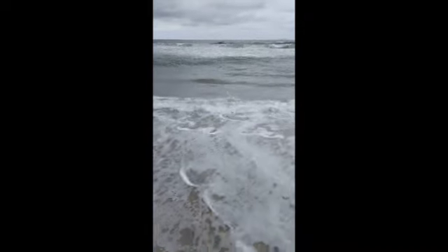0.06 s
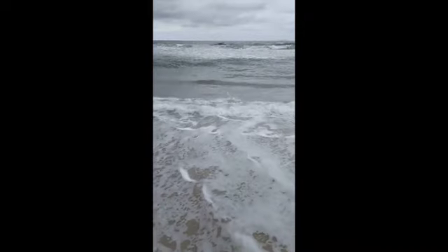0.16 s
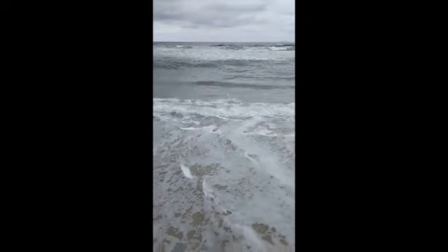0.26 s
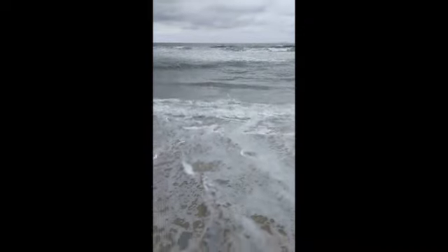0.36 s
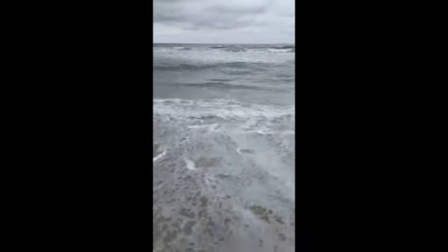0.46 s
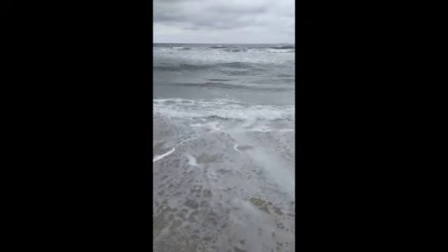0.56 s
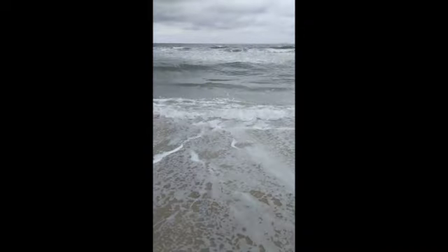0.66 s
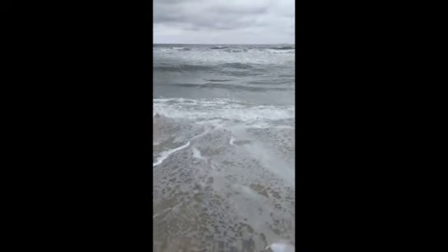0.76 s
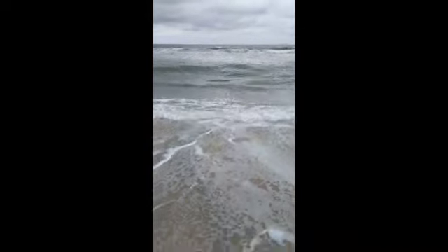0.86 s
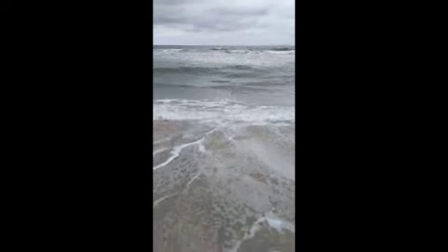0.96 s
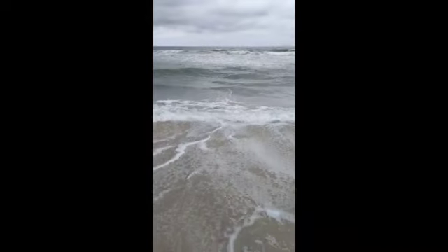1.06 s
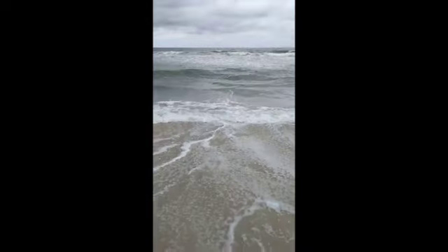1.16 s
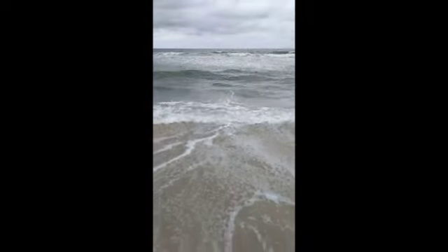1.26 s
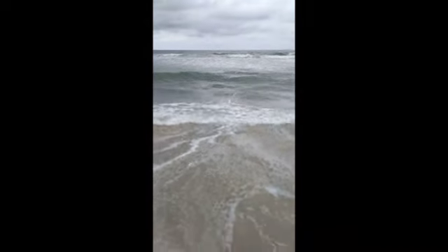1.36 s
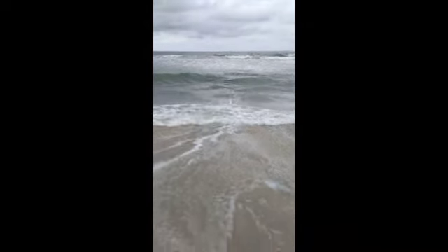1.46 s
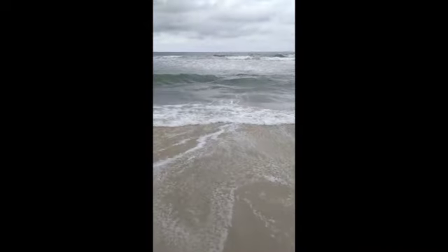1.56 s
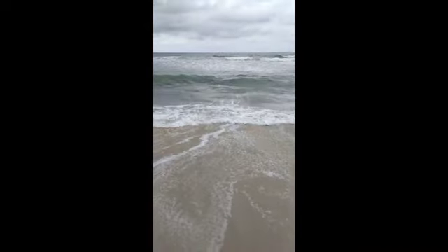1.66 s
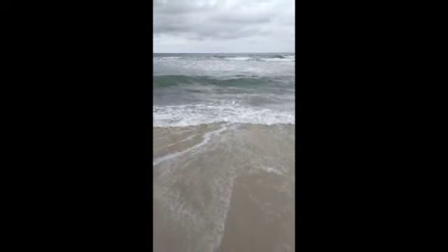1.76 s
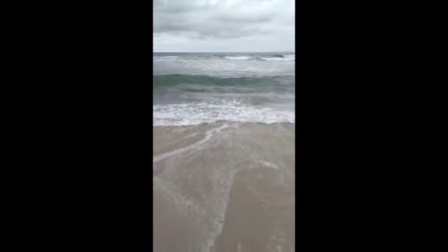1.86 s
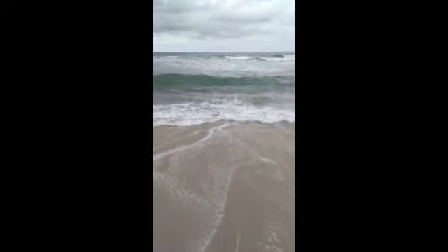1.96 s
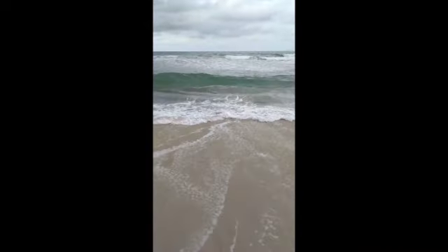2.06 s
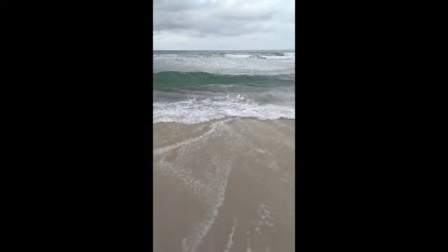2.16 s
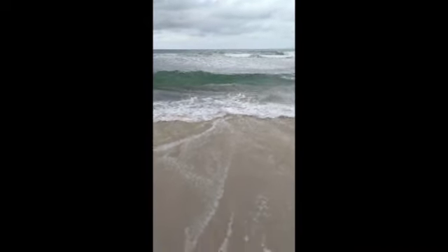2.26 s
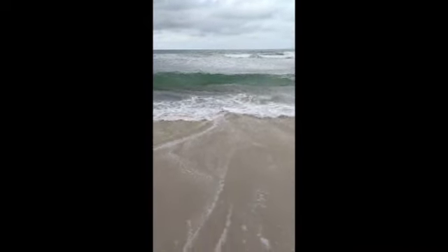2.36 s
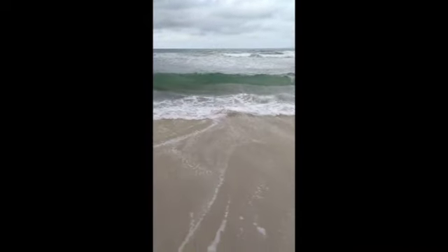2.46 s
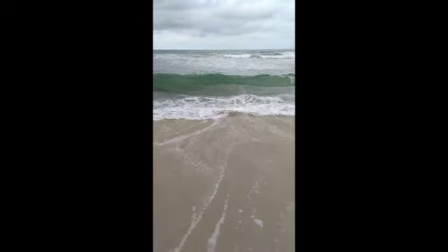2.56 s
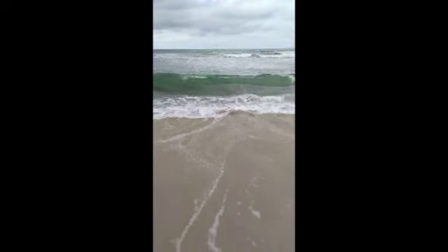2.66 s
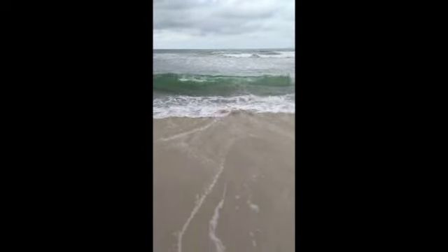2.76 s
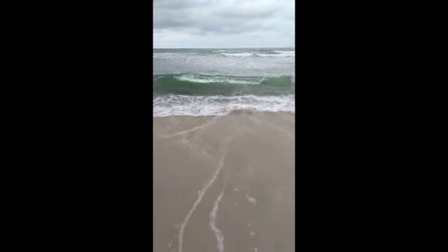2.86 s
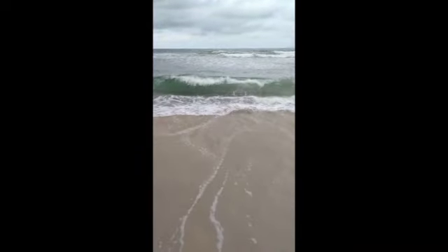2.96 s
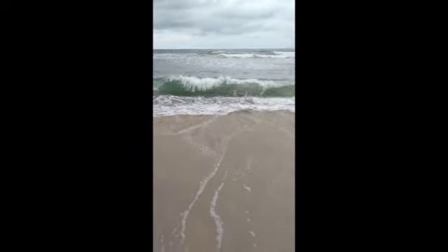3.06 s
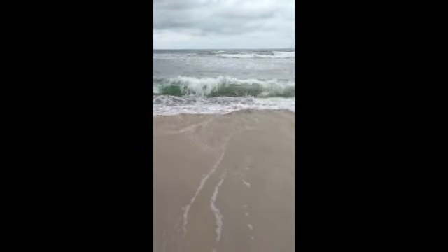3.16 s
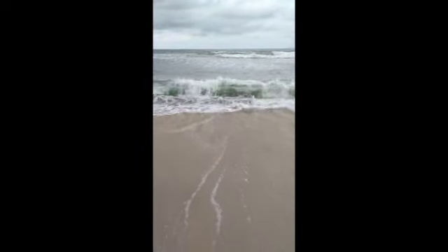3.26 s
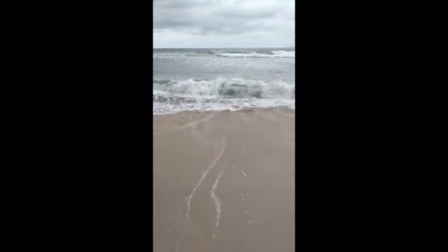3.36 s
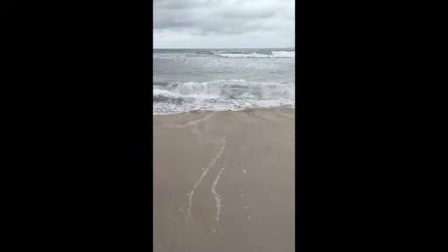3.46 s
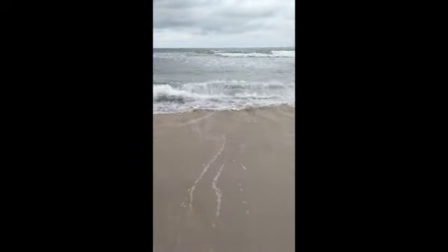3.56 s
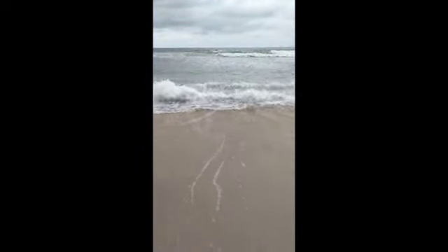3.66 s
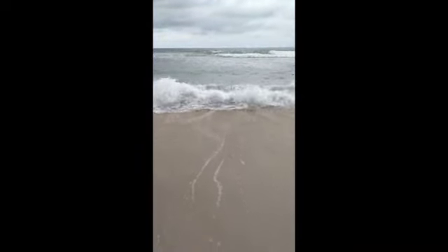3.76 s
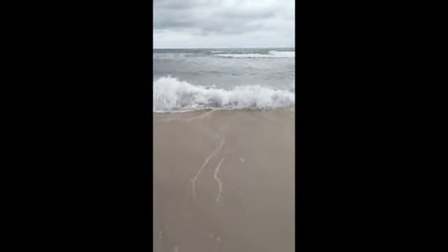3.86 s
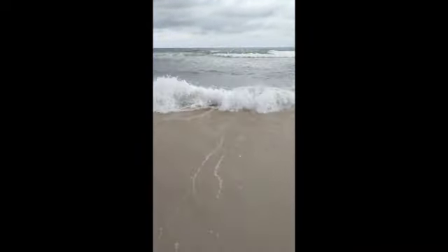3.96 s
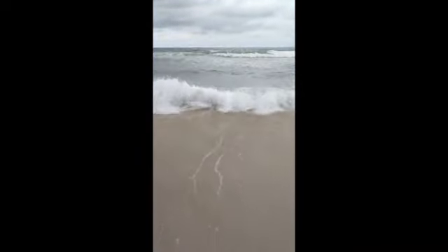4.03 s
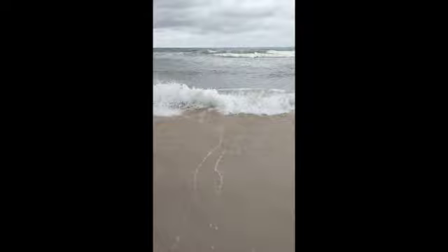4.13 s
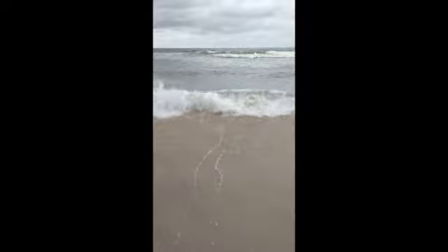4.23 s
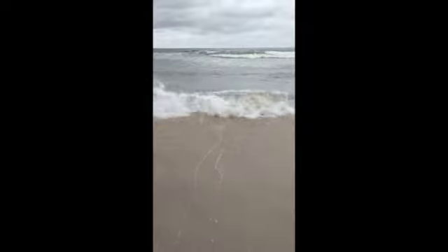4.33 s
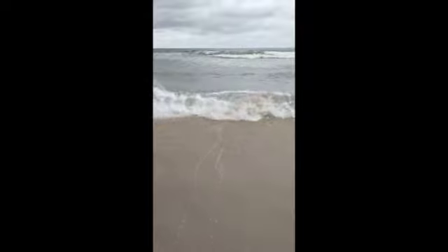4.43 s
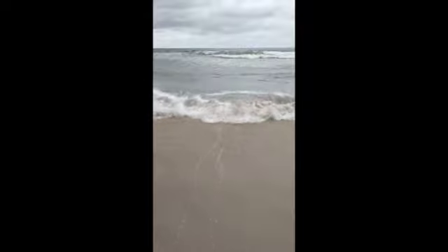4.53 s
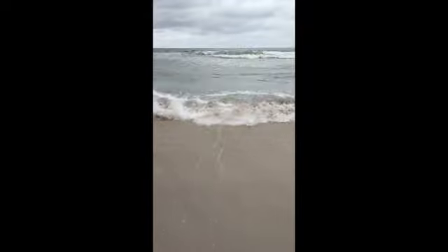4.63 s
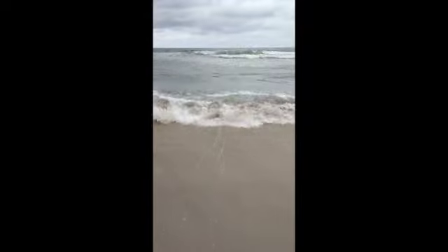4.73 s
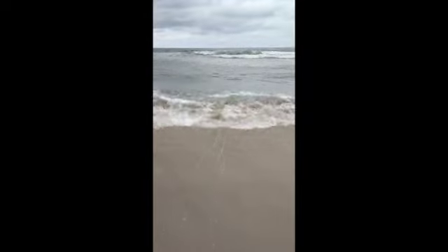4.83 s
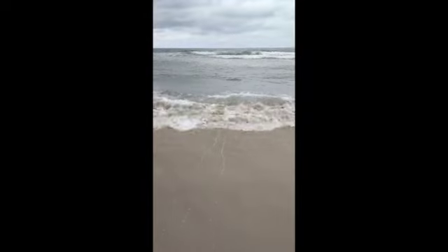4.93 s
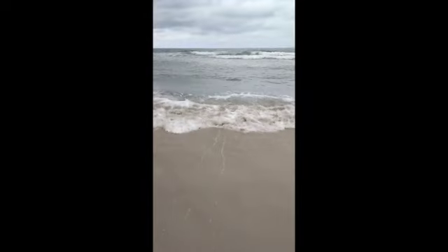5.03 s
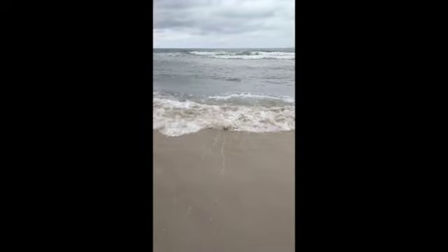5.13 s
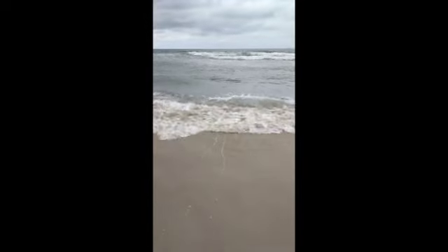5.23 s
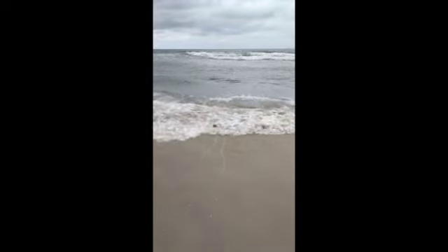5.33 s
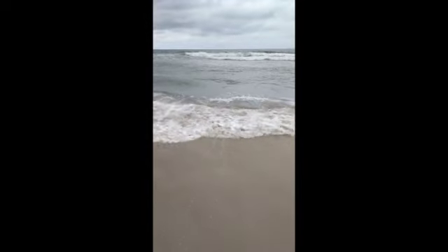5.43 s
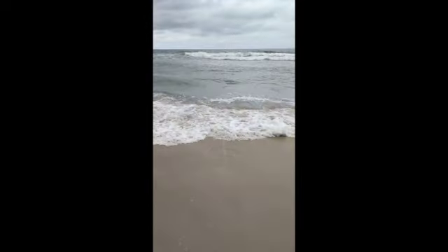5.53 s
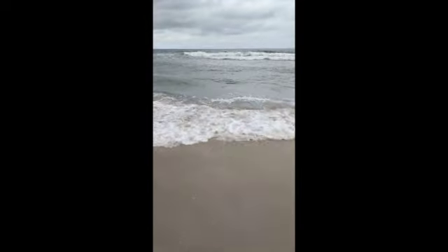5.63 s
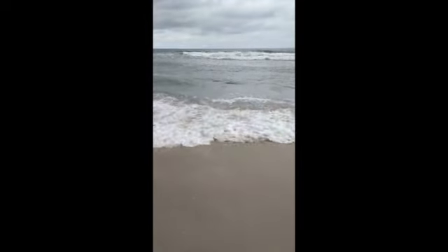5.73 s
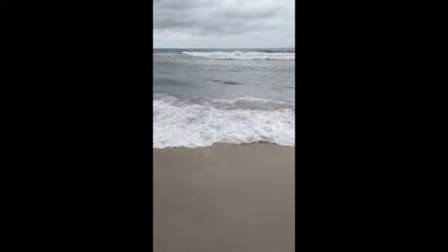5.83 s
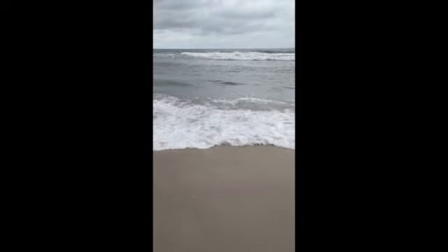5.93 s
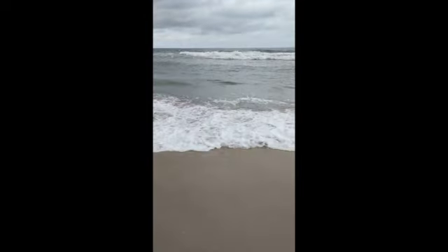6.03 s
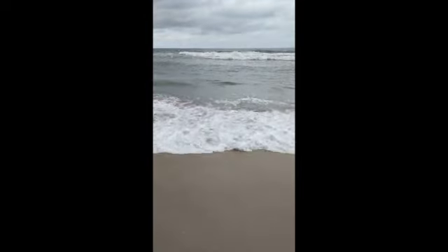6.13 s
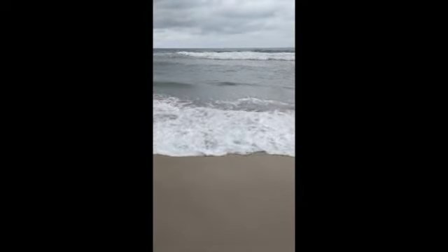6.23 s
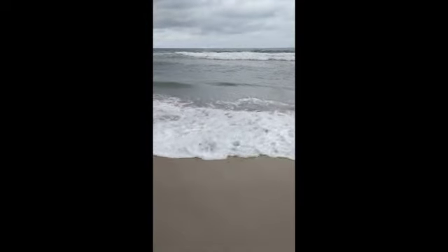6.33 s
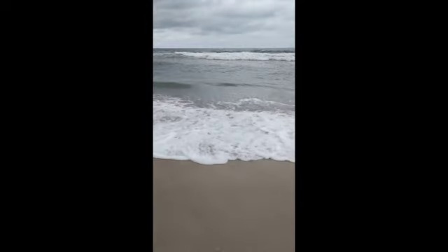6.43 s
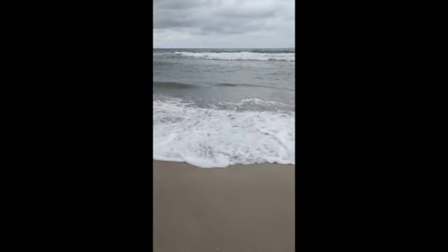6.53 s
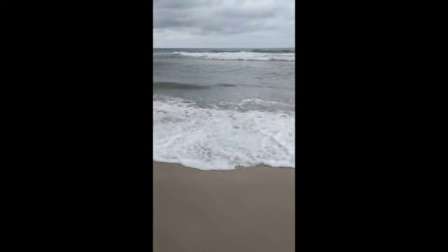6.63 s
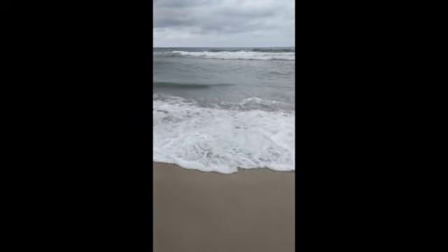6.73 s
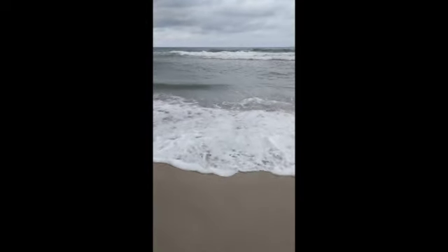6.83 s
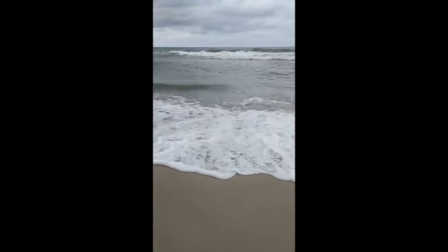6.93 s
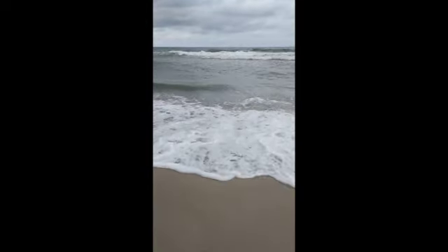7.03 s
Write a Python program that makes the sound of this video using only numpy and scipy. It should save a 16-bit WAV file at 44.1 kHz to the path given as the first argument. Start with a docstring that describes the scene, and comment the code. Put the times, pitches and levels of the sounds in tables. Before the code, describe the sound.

Outdoors on a sandy shore, heard close through a hand-held stereo microphone without wind protection. At 0 s a strong foamy wash drops quickly into a quieter draining rush. Until about 2.2 s, wind rumbles and hits the microphone in irregular, dull, bassy thumps, crowded between 0.6 and 1.8 s, with a heavy one near 2.2; the sound ducks briefly after the strongest. Around 2.8 s the surf brightens suddenly as the next wave curls over. From 3 to 4.7 s it breaks in uneven surges, deep boom and mid roar beneath splashing and dense, fine bubbling hiss, fullest around 4.1 to 4.7. It then runs up the sand as a broad fizzing wash, easing after 5.5 s. Scattered wind thumps continue near 3.2, 4.1, 4.7 and 5.1, with several softer ones from 6.2 to 6.9. A brief low surge comes near 6.5 before the thinner foam fades somewhat by 7 s.

```python
"""Surf and wind on a sandy beach

One wave drains away, then the next curls over, breaks and runs up the sand as fizzing foam.
The surf is patchy noise mixed with small ringing bubbles, in four layers: boom, roar, splash and hiss.
Wind rumbles and thumps on the two ports of a hand-held microphone, which widens its stereo by
taking a delayed copy of each port from the other. Its gain control ducks after strong thumps.
"""
import sys
import numpy as np
from scipy import signal
from scipy.fft import rfft, irfft, next_fast_len
from scipy.io import wavfile
from scipy.ndimage import uniform_filter1d, map_coordinates

SR = 44100
rng = np.random.default_rng(int(sys.argv[2]) if len(sys.argv) > 2 else 0)


def int16_out(signal):
    """Quantize to a 16-bit WAV file."""
    q = np.round(np.clip(np.atleast_2d(signal).T, -1, 1) * 32767)
    wavfile.write(sys.argv[1], SR, q.astype(np.int16))


N = 312669  # length [samples]
CROSS_DELAY_S = 18.9 / SR  # delay of the copy taken from the other port
TOP_HZ = 14300  # nothing is kept from this frequency up

# How the sea reaches the two ports, before the widening:
# (frequency [Hz], likeness of the ports [0-1], left lead [rad], left over right [dB])
SEA_AT_PORTS = [(120, .93, 0, 0), (320, .99, .02, -.4), (500, .86, .4, -4.5), (640, .5, 1.8, -2.5),
                (800, .6, 1.6, 3.5), (1000, .5, 1, 1), (1400, .5, 2.4, 2), (1850, .65, 2.1, 3),
                (2000, .6, 2.2, 2.5), (2110, .998, 3.13, .1), (2480, .995, 3.13, .1), (2600, 0, 3.1, 3),
                (4250, .1, 3.1, 2), (4450, .96, 3.1, .2), (4900, .96, 3.1, .2), (5200, .1, 3.1, 1.5),
                (7000, .1, 3.1, 0), (9000, .05, 0, -2.3), (12000, .05, 0, -5.5)]
# The same columns for wind, which presses on each port almost by itself:
# (frequency [Hz], likeness of the ports [0-1], left lead [rad], left over right [dB])
WIND_AT_PORTS = [(100, 0.42, 0.035, -0.44)]


def amp(db):
    """Turn decibels into a gain factor."""
    return 10 ** (np.asarray(db) / 20)


def unit(x):
    """Scale to an rms (average strength) of 1."""
    return x / np.sqrt(np.mean(x ** 2) + 1e-20)


def along(points, hz):
    """Read each column after the frequency at the given pitches, on a logarithmic axis."""
    f, *columns = np.transpose(points)
    return np.array([np.interp(np.log(hz + 1), np.log(f + 1), column) for column in columns])


def curves(rows):
    """Draw each column after the time as a curve with one value per sample."""
    s, *columns = np.transpose(rows)
    return [np.interp(np.arange(N) / SR, s, column) for column in columns]


def wobble(rate):
    """Make a smooth random curve through `rate` random points a second."""
    points = rng.standard_normal(int(N * rate / SR) + 4)
    return map_coordinates(points, [np.arange(N) * rate / SR])


def churn(patchy_db, size=7):
    """Two unrelated noises share brief patches of random gain, smoothed over `size` frequency bins."""
    noise_bins = signal.stft(rng.standard_normal((2, N)), nperseg=512)[2]
    patches = rng.standard_normal(noise_bins.shape[1:])
    patches = uniform_filter1d(patches, size, 0)  # smooth over frequency
    patches = uniform_filter1d(patches, 12, 1)  # smooth over time
    patchy_bins = noise_bins * amp(patchy_db * unit(patches))
    return unit(signal.istft(patchy_bins, nperseg=512)[1][:, :N])


def bubbles(pitch_hz, cycles, spread_db, count, size):
    """Bubbles ring as dying sines that rise in pitch, many weak and a few strong, in two streams."""
    when, port = rng.random((2, count))
    hz = np.clip(pitch_hz * np.exp(.5 * rng.standard_normal((count, 1))), 100, TOP_HZ)
    strength = amp(spread_db * np.minimum(rng.exponential(size=(count, 1)), 4))

    # age counts from 0; it is 1 after `cycles` cycles of the starting pitch
    step = (hz / SR / cycles).astype(np.float32)
    age = step * np.arange(size, dtype=np.float32)
    rise = 1 + 0.078 * np.minimum(age, 2)
    ring = strength * np.exp(-3 * age) * np.sin(2 * np.pi * cycles * age * rise)

    # both streams lie end to end while the rings are added up
    start = (when * (N - size)).astype(int) + N * (port > .5)
    places = start[:, None] + np.arange(size)
    return unit(np.bincount(places.ravel(), ring.ravel(), 2 * N).reshape(2, N))


def picked_up(pair, spectrum, ports, size=8192):
    """Two unrelated signals become one sound at the ports, widened and coloured, with an rms of 1."""
    # How much is taken from the other port: (frequency [Hz], share [0-1])
    crossfeed = [(30, .93), (300, .96), (1000, 1), (4900, 1), (6000, .72), (7100, .46), (9000, .22),
                 (13000, .15)]
    hz = np.fft.rfftfreq(size, 1 / SR)
    alike, lead, tilt_db = along(ports, hz)

    # the two signals are mixed so that the ports are as alike as the table says
    turn = np.arccos(np.clip(alike, -1, 1)) / 2
    left = np.array([np.cos(turn), np.sin(turn)]) * np.exp(1j * lead) * amp(tilt_db)
    right = np.array([np.cos(turn), -np.sin(turn)])

    # the delayed subtraction combs mid and side in turn, and puts wind in opposite phase
    cross = np.clip(along(crossfeed, hz), 0, 1) * np.exp(-2j * np.pi * hz * CROSS_DELAY_S)
    paths = np.array([left - cross * right, right - cross * left])
    total = np.sqrt(np.sum(np.abs(paths) ** 2, axis=(0, 1)) + 1e-12)
    paths *= amp(along(spectrum, hz)) / total

    responses = np.fft.fftshift(irfft(paths, size), axes=-1) * np.hanning(size)
    heard = signal.oaconvolve(pair[None].astype(np.float32), responses.astype(np.float32), axes=-1)
    heard = heard.sum(axis=1)[:, size // 2:][:, :N]  # drop the filter's own delay
    return unit(heard.astype(float))


def wind():
    """Gusts rise out of a light breeze; their turbulence presses on each port separately, in lumps."""
    # Colour of the rumble: (frequency [Hz], relative level [dB per Hz])
    rumble = [(15, -35), (30, -27), (45, -9), (62, 1), (120, 0), (180, -4.5), (260, -13), (450, -25),
              (1500, -60)]
    # Gusts that swell and ease: (time of the crest [s], half length [s], level over the lumps [dB])
    gusts = [(0.154, .1, -20.5), (0.608, 0.046, -18.5), (0.803, 0.2, -21.5), (1.297, 0.35, -23.5),
             (1.803, 0.22, -25.5), (2.552, .15, -27), (3.107, 0.09, -25), (3.7, .3, -29),
             (4.076, 0.12, -25.5), (4.372, 0.12, -25), (5.5, 0.39, -23.5), (5.975, 0.061, -20),
             (6.24, 0.12, -26), (6.58, 0.12, -21), (6.83, 0.036, -26)]
    breeze_db = -27.5  # wind between gusts
    t = np.arange(N) / SR
    power = amp(breeze_db) ** 2
    for crest_s, half_s, db in gusts:
        power = power + amp(db) ** 2 * np.exp(-((t - crest_s) / half_s) ** 2)
    flow = picked_up(rng.standard_normal((2, N)), rumble, WIND_AT_PORTS)
    lumpy_flow = unit(flow * amp(0.78 * wobble(9.6)))
    return np.sqrt(power) * lumpy_flow


def eddies(size=2400):
    """A small whirl of air strikes as a bright puff and a short low thump, inverted and late on the left."""
    # Single eddies: (time [s], thump peak [dB], pitch [Hz], half length [s], puff peak over thump peak [dB])
    strikes = [(0.073, -14, 100, .005, -6), (0.178, -3.5, 137, 0.0026, -6.5), (0.613, -7, 110, 0.0027, -18),
               (0.75, -13, 75, .007, -14), (0.826, -2, 129, 0.0033, -21), (0.868, 0, 110, 0.0029, -11),
               (1.113, -6, 140, 0.0035, -14), (1.147, -2.5, 170, 0.0026, -6.5),
               (1.267, -6, 140, 0.0062, -4), (1.367, -9, 136, .0044, -10), (1.518, -4, 166, 0.0025, -12),
               (1.615, -4.5, 150, 0.0025, -16), (1.776, -3, 155, 0.0039, -11), (2.07, -15, 190, .006, -14),
               (2.185, 0, 115, .004, -10), (3.166, -6.5, 110, 0.0035, -10), (4.133, -4.5, 160, .0032, -15),
               (4.713, -3.5, 111, .002, -18), (5.092, -9, 130, .004, -16), (6.236, -10, 148, 0.004, -12),
               (6.527, -13, 110, 0.0035, -7), (6.646, -6, 111, 0.0023, -20), (6.866, -11, 110, 0.0048, -13)]
    # Colour of the puff: (frequency [Hz], relative level [dB per Hz])
    puff_colour = [(150, -22), (270, 10), (450, 6), (1000, -13), (2000, -35), (4000, -111)]
    puff_lead_s, puff_half_s = 0.0053, 0.0036  # the puff comes just ahead of the thump; its half length
    air = picked_up(rng.standard_normal((2, N)), puff_colour, WIND_AT_PORTS)
    offset = np.arange(size) - size // 2
    t = offset / SR - np.array([[CROSS_DELAY_S], [0]])  # left, right
    out = np.zeros((2, N))
    for (s, db, hz, half_s, puff_db), phase in zip(strikes, rng.random(len(strikes))):
        at = round(s * SR) + offset
        swell = np.exp(-.5 * (t / half_s) ** 2)
        thump = swell * np.sin(2 * np.pi * (hz * t + phase)) * [[-1], [1]]
        puff = np.exp(-.5 * ((t + puff_lead_s) / puff_half_s) ** 2) * air[:, at]
        thump = thump / np.abs(thump).max()
        puff = puff / np.abs(puff).max()
        out[:, at] += amp(db) * (thump + amp(puff_db) * puff)
    return out


def boom():
    """Large clouds of air under the wave boom: steady noise with long, low bubble rings."""
    # Colour of the boom: (frequency [Hz], relative level [dB per Hz])
    deep = [(40, -35), (110, -10), (170, -7.5), (240, -6), (330, -6.5), (420, -8), (600, -15.5),
            (1200, -76)]
    rings = bubbles(pitch_hz=290, cycles=16.9, spread_db=1.0, count=700, size=4000)
    return picked_up(churn(patchy_db=0.0) + 0.25 * rings, deep, SEA_AT_PORTS)


def roar():
    """Tumbling water roars: slightly patchy noise with short bubble rings."""
    # Colour of the roar: (frequency [Hz], relative level [dB per Hz])
    colour = [(100, -5), (250, -5.5), (400, 1), (520, 0.5), (680, -2), (950, -2), (1300, -8.5), (1900, -9),
              (4000, -111)]
    rings = bubbles(pitch_hz=615.5, cycles=6.9, spread_db=3, count=2400, size=1100)
    return picked_up(churn(patchy_db=0.66, size=4) + 0.095 * rings, colour, SEA_AT_PORTS)


def splash():
    """Drops splash on the face of the breaker: patchy noise with many higher rings."""
    # Colour of the splash: (frequency [Hz], relative level [dB per Hz])
    colour = [(600, -40), (1200, -12), (1550, -4.5), (1900, 1), (2300, 1.8), (2650, 0.5), (3200, -6),
              (4200, -11), (6000, -22), (12000, -45)]
    rings = bubbles(pitch_hz=2000, cycles=18, spread_db=1, count=9000, size=350)
    return picked_up(churn(patchy_db=1.3) + 0.22 * rings, colour, SEA_AT_PORTS)


def foam():
    """Small bubbles burst in the foam: patchy hiss with very short, high rings."""
    # Colour of the foam: (frequency [Hz], relative level [dB per Hz])
    hiss = [(1500, -37), (2700, -2), (4000, -1.4), (5100, 0), (6300, 0.5), (8000, -1.1), (10300, -1.5),
            (12300, 5.5), (13200, -0.8), (14300, -3.1)]
    rings = bubbles(pitch_hz=7500, cycles=3, spread_db=3.3, count=14000, size=60)
    return picked_up(churn(patchy_db=1.1, size=10) + .35 * rings, hiss, SEA_AT_PORTS)


def surf():
    """One wave drains, the next breaks and runs up; uneven collapse makes all four layers surge together."""
    # Levels before plunges and surges:
    # (time [s], boom level [dB], roar level [dB], splash level [dB], foam level [dB])
    wash = [(0, -25.5, -24, -30, -27), (.3, -31, -29, -36.5, -34), (.7, -32.5, -26.5, -34.5, -32),
            (1, -31.5, -26.5, -33.5, -33.5), (1.3, -32, -28.5, -36.5, -34.5),
            (1.85, -33, -29, -34.5, -35.5), (2.12, -29, -27.5, -35.5, -32.5), (2.5, -31.5, -29, -39.5, -34),
            (2.74, -27, -27.5, -36, -33), (2.8, -28, -25, -28, -25.5), (3.14, -25, -24.5, -27, -24.7),
            (3.24, -27.5, -26.5, -32.5, -27.5), (3.55, -24.5, -24, -27, -25), (3.8, -25, -25.5, -32, -26),
            (4.3, -23, -23.5, -28, -24.5), (4.68, -24, -21.5, -30, -26), (4.76, -23.5, -24.5, -29.5, -28),
            (4.95, -28.5, -23.5, -29, -27), (5.5, -25, -24, -27.5, -27.5), (6.05, -29.5, -28, -31.5, -31.5),
            (6.6, -23, -30, -35, -32.5), (6.7, -33.5, -31, -37.5, -35.5), (7.09, -27, -33.5, -38.5, -36.5)]
    # Sections of the crest that plunge one after another:
    # (time [s], added to the boom [dB], added to the roar [dB])
    plunges = [(3.03, 2, 2), (3.46, 1.5, -0.5), (3.68, 3, 2), (3.78, 2, 2), (3.9, 2, 2), (4.14, 4.5, 3),
               (4.38, 1, -0.5), (4.65, 1.5, -1), (5.5, -0.5, 0.5), (6.46, 0, 2.5)]
    plunge_half_s = 0.035
    boom_db, roar_db, splash_db, foam_db = curves(wash)
    t = np.arange(N) / SR
    for s, boom_change_db, roar_change_db in plunges:
        plunge = np.exp(-((t - s) / plunge_half_s) ** 2)
        boom_db = boom_db + boom_change_db * plunge
        roar_db = roar_db + roar_change_db * plunge

    surge = wobble(14)  # the crest collapses unevenly, and all of the wave follows
    boom_db = boom_db + 0.26 * surge
    roar_db = roar_db + 0.77 * surge + 0.24 * wobble(22)
    splash_db = splash_db + 1.4 * surge
    foam_db = foam_db + .45 * surge + .45 * wobble(40)
    return amp(boom_db) * boom() + amp(roar_db) * roar() + amp(splash_db) * splash() + amp(foam_db) * foam()


def gain_control(x):
    """Peaks over a ceiling push the gain down within milliseconds; it then creeps back up."""
    limit_db, sense_s = -5, 0.0014  # ceiling for peaks; averaging time of the wave before its peak is read
    fall_s, recover_db_per_s = 0.0062, 10.5  # time the gain takes to fall; speed of its return
    averaged = uniform_filter1d(x, max(1, round(sense_s * SR)), axis=1)
    peak = np.abs(averaged).max(axis=0)
    over_db = np.maximum(20 * np.log10(peak + 1e-9) - limit_db, 0)
    # the largest overshoot so far is held, while the recovery steadily works it off
    recovered_db = recover_db_per_s * np.arange(N) / SR
    gain_db = recovered_db - np.maximum.accumulate(over_db + recovered_db)
    return x * amp(uniform_filter1d(gain_db, max(1, round(fall_s * SR))))


def scene():
    """Add the wind and its eddies, tilted a little to the right, to the surf."""
    windy = (wind() + eddies()) * amp([[-.6], [.6]])  # left, right [dB]
    return windy + surf()


def record(dry):
    """Duck everything after strong thumps, round off the peaks and cut the treble at the band limit."""
    held = gain_control(dry)
    rounded = held / (1 + np.abs(held / .8) ** 10) ** (1 / 10)  # peaks level off at .8
    m = next_fast_len(N + SR // 2)  # room for the filter to ring out
    kept = np.fft.rfftfreq(m, 1 / SR) < TOP_HZ
    return irfft(rfft(rounded, m) * kept, m)[:, :N]


dry = scene()
out = record(dry)
int16_out(out)
```